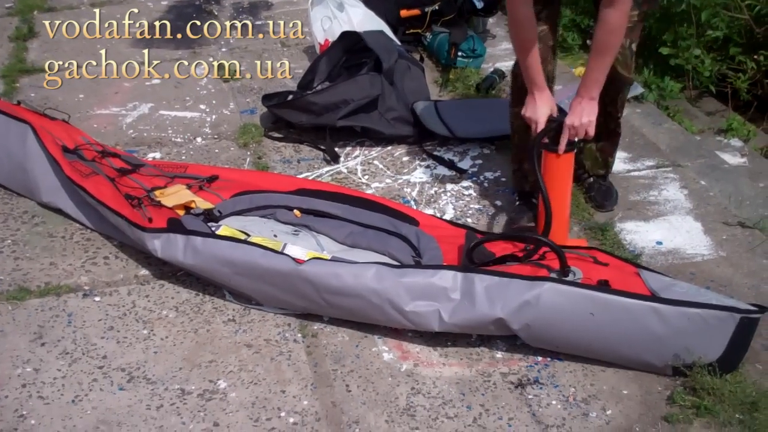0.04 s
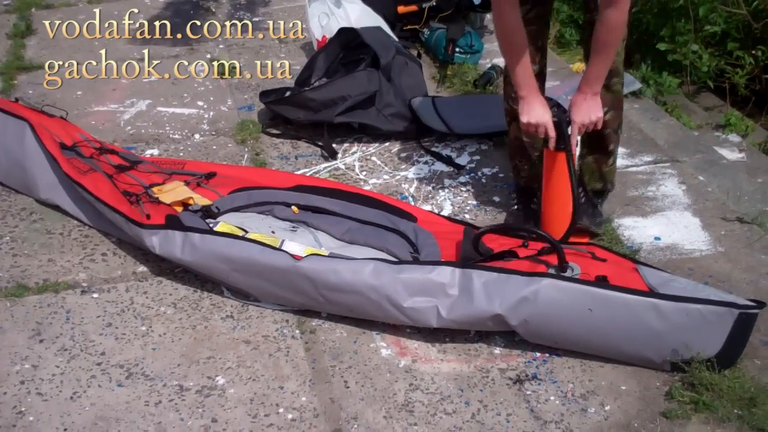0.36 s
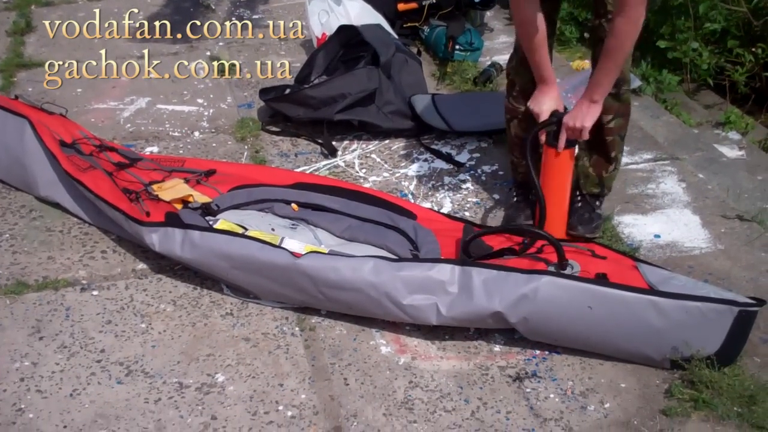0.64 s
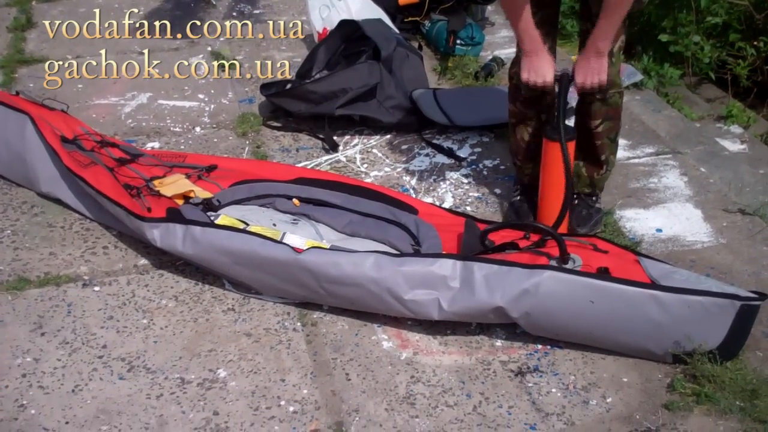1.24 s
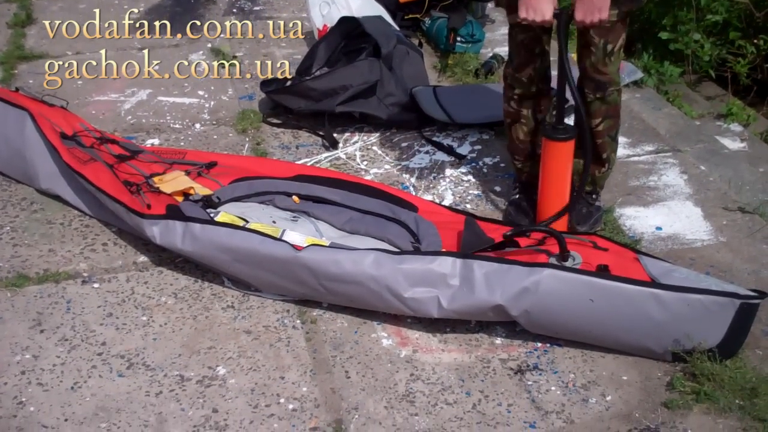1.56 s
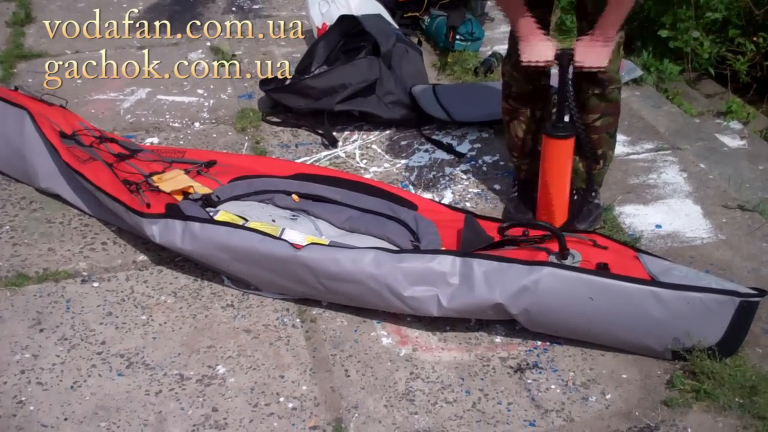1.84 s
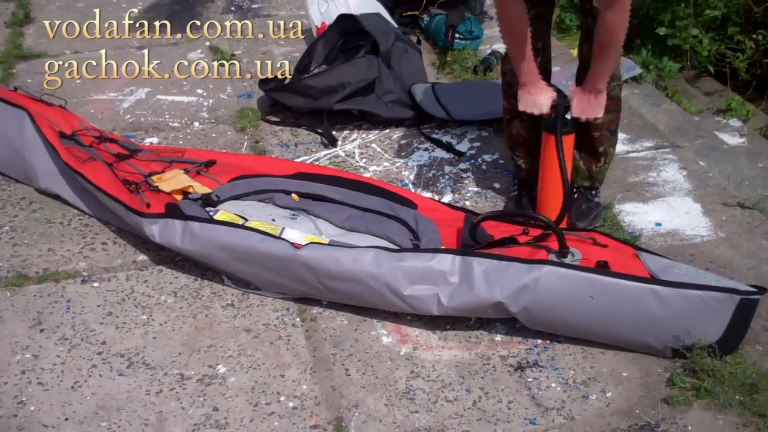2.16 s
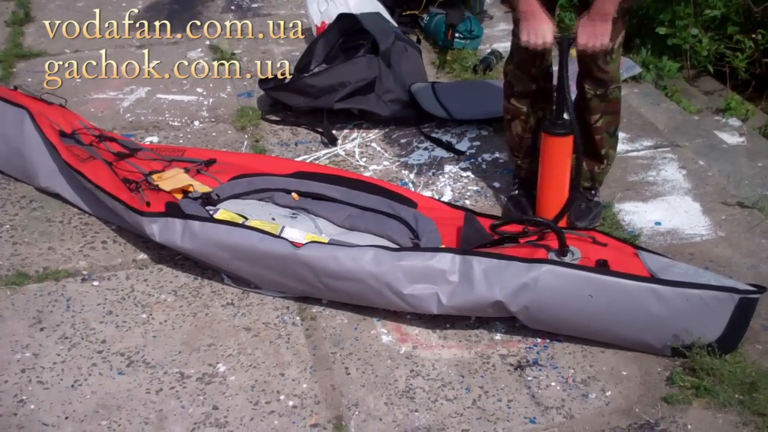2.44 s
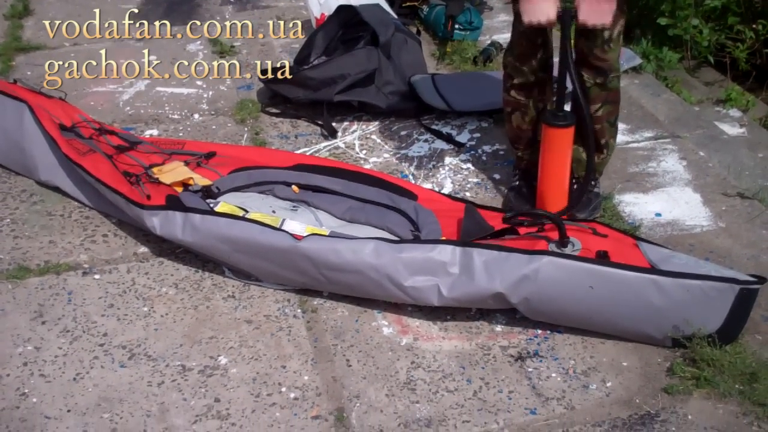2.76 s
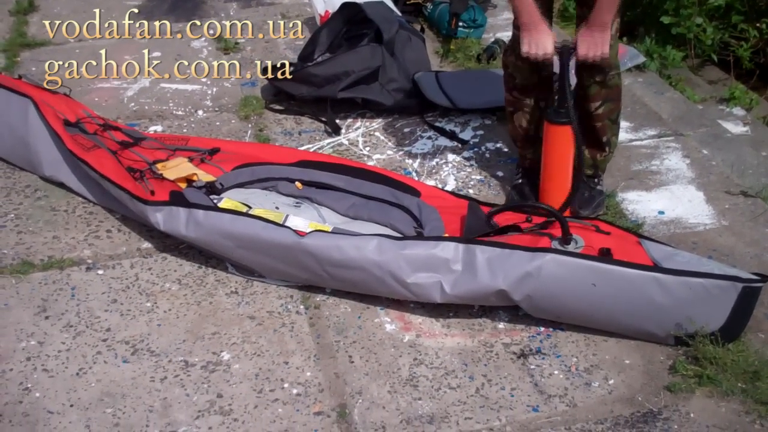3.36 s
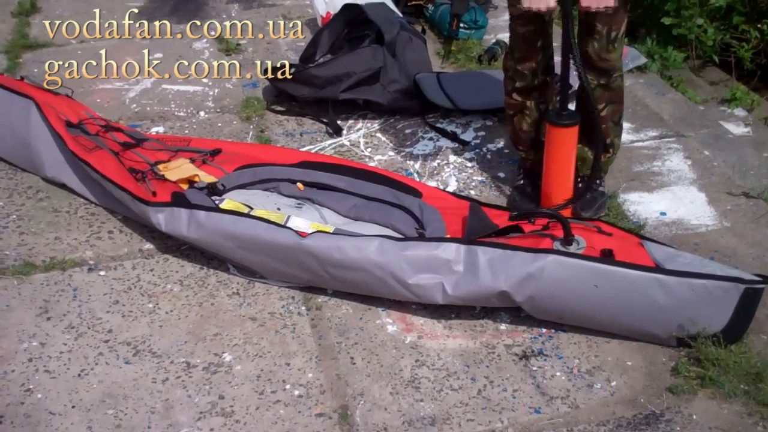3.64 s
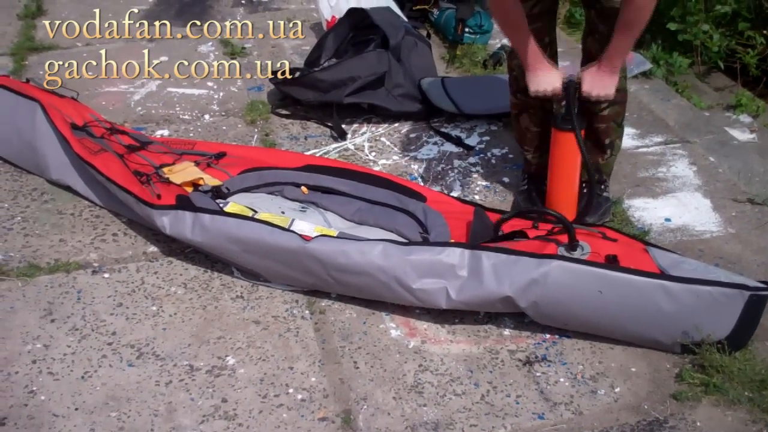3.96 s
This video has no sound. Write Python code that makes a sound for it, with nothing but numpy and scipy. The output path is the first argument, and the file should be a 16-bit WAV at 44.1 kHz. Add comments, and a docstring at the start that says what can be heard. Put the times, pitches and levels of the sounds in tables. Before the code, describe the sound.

A hand pump fills an inflatable kayak outdoors, a few metres away. It starts with a dull push and light plastic rattles, ending in a knock at about 0.5 seconds. After a few clicks, six airy, hissing strokes run from 1.2 seconds, roughly one every half second, the last still going at 4 seconds. Occasional small knocks and a faint low rumble and hum of air sit underneath.

```python
"""Hand pump filling a kayak

A double-action pump fills an inflatable kayak on a concrete yard, a few metres away. One dull,
rattling push ends in a knock; after a pause, six strokes hiss through the intake valves, up and down
in turn. The hiss is turbulent noise, comb-filtered by echoes in the barrel as the piston travels.
Impacts excite the plastic body, and air rumbles on into the hull over two low hums."""
import sys
import numpy as np
from scipy import signal
from scipy.fft import rfft, irfft
from scipy.io import wavfile
from scipy.ndimage import uniform_filter1d

SR = 44100
rng = np.random.default_rng(int(sys.argv[2]) if len(sys.argv) > 2 else 0)


def persist_wave(psi):
    """Save psi, clipped to +-1, as 16-bit WAV."""
    counts = np.round(np.clip(psi, -1, 1) * 32767).astype(np.int16)
    wavfile.write(sys.argv[1], SR, np.atleast_2d(counts).T)


N = 176400
HOP = 256
TIME = np.arange(N) / SR
FRAME_S = np.arange(N // HOP + 5) * HOP / SR
HZ = np.fft.rfftfreq(4 * HOP, 1 / SR)

# Response of the plastic to light contact: frequency_hz, gain_db
TICK_COLOUR = [(300, -47), (1500, 8.5), (2300, -1), (2700, 7), (3150, 1), (4300, 2), (6300, 0), (8000, -5),
               (10000, -4), (12000, -30), (14000, -34)]
# Level difference between the microphones: frequency_hz, left_minus_right_db
BALANCE = [(60, 5.1), (350, 4.9), (1150, 3.5), (2070, 4.3), (3730, 5.5), (6720, 10.5), (12100, 10.3)]


def valves():
    """Turbulent hiss brightens with flow and climbs with piston speed; two chambers comb-filter it."""
    # Air flow, one curve per stroke: time_s, level_db
    strokes = [
        [(1.13, -55), (1.166, -62), (1.172, -36), (1.244, -29), (1.382, -27), (1.606, -33), (1.654, -40),
         (1.71, -79)],
        [(1.73, -55), (1.772, -45.5), (1.782, -32), (1.79, -30.5), (1.878, -28), (2.186, -32), (2.26, -69.5)],
        [(2.28, -81), (2.31, -38), (2.36, -28.5), (2.578, -27), (2.598, -30), (2.656, -29), (2.722, -50.5),
         (2.74, -63)],
        [(2.77, -61), (2.772, -71), (2.824, -33.5), (2.902, -30), (3.126, -31), (3.208, -41), (3.246, -51.5),
         (3.27, -75)],
        [(3.28, -73), (3.308, -41.5), (3.328, -35), (3.372, -28.5), (3.45, -27), (3.642, -32), (3.672, -41),
         (3.73, -68)],
        [(3.75, -69.5), (3.808, -37), (3.84, -28), (3.89, -29), (3.912, -33.5), (4.0, -33.5)],
    ]
    # Tone of each stroke: jet_weight_db, treble_db_per_octave
    stroke_tones = [(5, -1.5), (4.5, -1.5), (6.5, -.5), (7, -0.5), (7, -0.5), (9, 0)]
    # Hiss spectra when pulling and when pushing: frequency_hz, density_db
    pull = [(300, -38), (1000, -15), (1650, -17.5), (2000, -5), (2400, -4), (3100, -4), (3800, -3),
            (5300, -3.5), (6300, -1.5), (6900, -9.5), (7600, -15), (9000, -17.5), (11700, -29.5),
            (12500, -62)]
    push = [(300, -31), (1000, -12), (1650, -19), (2000, -7.5), (2400, -5), (3100, -7.5), (3800, -3.5),
            (5300, -2), (6300, -0.5), (6900, -9.5), (7600, -13), (9000, -15), (11700, -31.5), (12500, -63)]
    # Fixed resonances of the intake: frequency_hz, boost_db
    intake_modes = [(1950, 2), (2400, 4.5), (2815, 3), (3100, 6), (3370, 2.5), (4190, 2), (4540, 2),
                    (5750, 1.5), (6150, 4), (6500, 2)]
    jet_hz, jet_climb_hz, jet_width_hz = 2050, 1050, 270
    whistle_hz, whistle_climb_hz, whistle_width_hz = 2055, 1020, 102
    near_ms, travel_ms, reflection = 0.53, 2.3, -0.11  # round trips on either side of the piston
    modes_db = sum(db / (1 + ((HZ - hz) / 114) ** 2) for hz, db in intake_modes)  # half-width 114 Hz
    # A fixed 2.7 ms echo, probably off the ground, ripples the treble
    treble_echo = abs(echo(HZ, ms=2.655, share=0.35 * (HZ > 2870)))
    wander_db = 1.72 * patches(frames=16, bins=5)  # narrow peaks come and go
    gain = np.ones((len(FRAME_S), len(HZ))) * unit(amp(read(pull, HZ)))
    flow = np.zeros(N)
    for k, stroke in enumerate(strokes):
        times, flow_db = np.transpose(stroke)
        start, end = times[0], times[-1]
        flow += level(stroke) * ((TIME >= start) & (TIME < end))
        now = (FRAME_S >= start) & (FRAME_S < end)
        t = FRAME_S[now, None]
        stroke_s = end - start if k < len(strokes) - 1 else 0.44  # the last stroke is unfinished
        progress = np.clip((t - start) / stroke_s, 0, 1)
        travel = (1 - np.cos(np.pi * progress)) / 2
        speed = np.sin(np.pi * progress ** 0.9)
        stretch = 1 + 0.12 * (speed - 2 / np.pi)
        colour_db = read(push if k % 2 else pull, HZ / stretch)
        jet_weight_db, treble_slope = stroke_tones[k]
        jet_db = 0
        for order, share in [(1, 0.53), (2, 0.21)]:  # the jet's peak and its weaker octave
            offset = (HZ / order - jet_hz - jet_climb_hz * speed) / jet_width_hz
            jet_db += jet_weight_db * share * np.exp(-0.5 * offset ** 2)
        detuning = (HZ - whistle_hz - whistle_climb_hz * speed) / whistle_width_hz
        whistle_db = 2.5 / (1 + detuning ** 2)  # faint and breathy
        excess_db = np.interp(t, times, flow_db) + 23.5  # flow relative to -23.5 dB
        bright_db = (treble_slope + 0.0849 * excess_db) * np.log2(np.maximum(HZ / jet_hz, 1))
        growing = echo(HZ, near_ms + travel_ms * travel, reflection)
        shrinking = echo(HZ, near_ms + travel_ms * (1 - travel), reflection)
        shape = amp(colour_db + jet_db + whistle_db + modes_db + bright_db + wander_db[now])
        shape *= treble_echo / abs(growing * shrinking)
        gain[now] = shape / np.sqrt(np.mean(shape ** 2, axis=1, keepdims=True))
    return flow * turbulence(gain, patch_db=1.87, flutter_db=0.38)


def knocks():
    """Impact excitation: piston and shaft strike the damped plastic body."""
    # Blows of piston and shaft: start_s, level_db, decay_s
    strikes = [(.0144, -27, 0.0026), (.279, -35.5, 0.01), (.348, -35, 0.0053), (.461, -33.5, 0.017),
               (.5292, -17.5, 0.0029), (.5362, -18.5, 0.0023), (.5395, -22.5, 0.002), (.787, -32.5, 0.0072),
               (.848, -29, 0.0021), (2.1835, -23.5, 0.0016), (2.659, -21.5, 0.0026), (2.715, -35.5, 0.0022),
               (3.639, -27.5, 0.0042), (3.860, -30, 0.0024)]
    # Response of the body to them: frequency_hz, gain_db
    colour = [(100, -14), (700, -14), (1000, -6), (1340, 2.5), (1600, 0.5), (2000, 4), (2700, -6),
              (3300, -6), (4200, -13), (6000, -20.5), (9000, -22), (12000, -38), (14000, -62)]
    return impacts(strikes, colour)


def ticks():
    """Free vibration: each light tick leaves the plastic handle ringing briefly in one damped mode."""
    # Contacts of handle, hose and valve: start_s, level_db, decay_s
    contacts = [(.0144, -34, 0.0046), (.026, -44, 0.0026), (.103, -39.5, 0.0033), (.174, -47, .006),
                (.194, -36, 0.003), (.2325, -36, 0.001), (.2455, -34.5, 0.0036), (.353, -38, 0.0087),
                (.462, -42, .006), (.486, -45, .003), (.514, -35.5, 0.0092), (.5285, -28, 0.0023),
                (.5415, -23.5, 0.0026), (.552, -47, 0.0023), (.604, -32, 0.0018), (.7865, -32.5, 0.0026),
                (.792, -33.5, 0.0012), (.799, -40, 0.0035), (.870, -50, .003), (.878, -45, 0.0024),
                (1.117, -48, .002), (1.149, -42, .002), (2.768, -45.5, 0.0018), (3.860, -30.5, .002)]
    handle_hz, decay_s, ring_db = 2820, 0.0077, -23
    clicks = impacts(contacts, TICK_COLOUR)
    t = TIME[:SR // 10]
    ring = np.sin(2 * np.pi * handle_hz * t) * np.exp(-t / decay_s)
    ring /= np.linalg.norm(ring)
    return clicks + amp(ring_db) * signal.oaconvolve(clicks, ring[None], axes=1)[:, :N]


def hull():
    """Flow noise: turbulent air rushes dully through the hose into the boat."""
    # Strength of the rush: time_s, relative_level_db
    rush = [(0.0, -40), (0.13, -40), (0.15, -37.5), (0.24, -40), (0.53, -39), (0.57, -51.5), (1.28, -40.5),
            (1.47, -48.5), (1.84, -42), (1.88, -46), (2.21, -45), (2.78, -51.5), (2.99, -48), (3.24, -51.5),
            (3.38, -47), (3.71, -54.5), (3.85, -49.5), (4.0, -53)]
    # Its spectrum: frequency_hz, density_db
    colour = [(20, -19), (35, -1), (70, 0), (140, -4.5), (200, -4.5), (310, -8), (430, -4.5), (600, -8),
              (950, -9), (1400, -16), (2200, -21.5), (4000, -32), (8000, -38), (11500, -46.5), (13000, -63)]
    return level(rush) * amp(2) * turbulence(amp(read(colour, HZ)), patch_db=1, flutter_db=1.1)


def rubbing():
    """Stick-slip friction: tiny slips of uneven size as the shaft slides and the hose shifts."""
    # Spells of sliding: start_s, length_s, level_db
    rubs = [(0, 0.6, -56), (0.745, .15, -55)]
    slips_per_s, spread_db = 900, 4.5
    slipping = rng.random(N) < slips_per_s / SR
    slips = slipping * amp(spread_db * np.minimum(rng.exponential(1, N), 4))
    gate = sum(amp(db) * ((TIME >= start) & (TIME < start + length)) for start, length, db in rubs)
    return body(gate * unit(slips * rng.choice([-1, 1], (2, N))), TICK_COLOUR)


def hums():
    """Random frequency and amplitude modulation makes two low tones waver."""
    # Envelopes of the upper and lower tone: time_s, level_db
    upper = [(0, -37), (.12, -40.5), (.52, -41.5), (.58, -72), (.8, -51), (1.28, -46.5), (1.55, -52),
             (2.2, -51), (2.7, -60.5), (4, -62)]
    lower = [(0, -49), (1.2, -65), (1.5, -55.5), (2.25, -50), (2.7, -53), (3.2, -51.5), (3.4, -80),
             (4, -64)]
    sound = np.zeros((2, N))
    for pitch_hz, drift_hz, envelope in [(102.1, 5.45, upper), (53.6, 4.1, lower)]:
        drift, waver = (unit(signal.resample(rng.standard_normal(64), N)) for _ in range(2))
        phase = 2 * np.pi * np.cumsum(pitch_hz + drift_hz * drift) / SR
        tone = np.sqrt(2) * np.sin(phase) * unit(amp(3 * waver))
        pan = amp(read(BALANCE, pitch_hz) * np.array([[0.5], [-0.5]]))
        sound += tone * level(envelope) * pan
    return sound


def turbulence(gain, patch_db, flutter_db):
    """Turbulence as spectrally shaped Gaussian noise, with drifting patches and a quick flutter."""
    a, b, c, d = rng.standard_normal((4, len(FRAME_S), len(HZ)))
    eddies_db = patch_db * patches(frames=5, bins=7)
    flicker_db = flutter_db * rng.standard_normal((len(FRAME_S), 1))
    spectra = pair(a + 1j * b, c + 1j * d, HZ) * gain * amp(eddies_db + flicker_db)
    noise = signal.istft(spectra.swapaxes(1, 2), nperseg=4 * HOP, noverlap=3 * HOP)[1][:, :N]
    return noise / np.std(noise.mean(0))


def impacts(table, colour):
    """Each blow is an exponentially decaying chatter of plastic, with faint reverberation of the yard."""
    rise_s, tail_db, tail_s = 0.00043, -35, 0.02
    force = np.zeros(N)
    for start, db, decay_s in table:
        t = np.maximum(TIME - start, 0)
        fall = np.exp(-t / decay_s) + amp(tail_db) * np.exp(-t / tail_s)
        force += amp(db) * np.minimum(t / rise_s, 1) * fall
    return body(force * rng.choice([-1, 1], (2, N)), colour)


def body(force, colour):
    """The damped plastic body is a minimum-phase filter on two click trains; the ground adds an echo."""
    hz = np.fft.rfftfreq(N, 1 / SR)
    magnitude = unit(amp(read(colour, abs(np.fft.fftfreq(N, 1 / SR)))))
    response = np.exp(np.conj(signal.hilbert(np.log(magnitude))))[:len(hz)]
    ground = echo(hz, ms=2.6, share=0.074)
    return irfft(pair(*rfft(force), hz) * response * ground, N)


def pair(a, b, hz):
    """Partial coherence: two independent spectra mix into left and right, apart in level and phase."""
    # Likeness of the two channels: frequency_hz, coherence
    likeness = [(130, 0.93), (580, .96), (1250, 0.83), (2660, 1), (5680, 0.64), (12100, 0.4)]
    # Phase difference between them: frequency_hz, left_lead_rad
    lead = [(100, 0), (3900, 0.75), (6200, -.8), (9200, -0.73), (11500, -9)]
    coherence = np.clip(read(likeness, hz), 0, 1)
    tilt = amp(read(BALANCE, hz) / 2)
    right = coherence * a + np.sqrt(1 - coherence ** 2) * b
    return np.array([a * tilt, right * np.exp(-1j * read(lead, hz)) / tilt])


def echo(hz, ms, share):
    """Comb filter: a sound interferes with one delayed copy of itself."""
    return 1 + share * np.exp(-2j * np.pi * hz * ms / 1000)


def patches(frames, bins):
    """Noise smoothed over time and frequency forms random blotches, rms 1."""
    noise = rng.standard_normal((len(FRAME_S), len(HZ)))
    return unit(uniform_filter1d(uniform_filter1d(noise, size=frames, axis=0), size=bins, axis=1))


def read(points, hz):
    """Interpolates a spectrum on a log-frequency axis."""
    frequencies, values = np.transpose(points)
    return np.interp(np.log(hz + 1), np.log(frequencies), values)


def level(points):
    """Amplitude envelope from a curve in decibels."""
    return amp(np.interp(TIME, *np.transpose(points)))


def amp(db):
    """Decibels to amplitude ratio."""
    return 10 ** (np.asarray(db) / 20)


def unit(x):
    """Normalises to rms 1."""
    return x / np.sqrt(np.mean(abs(x) ** 2) + 1e-20)


def scene():
    """Superposition of pump, boat and hums."""
    rattles = knocks() + ticks() + rubbing()
    return valves() + hull() + rattles + hums()


def record(dry):
    """Band limiting: a linear-phase low-pass removes the highest treble."""
    cutoff_hz = 12700
    low_pass = signal.firwin(255, cutoff_hz, window=("kaiser", 8), fs=SR)
    return signal.oaconvolve(dry, low_pass[None], "same")


dry = scene()
out = record(dry)
persist_wave(out)
```